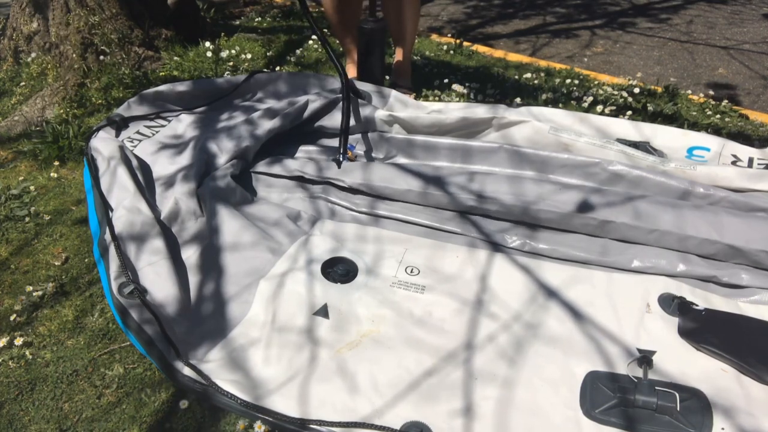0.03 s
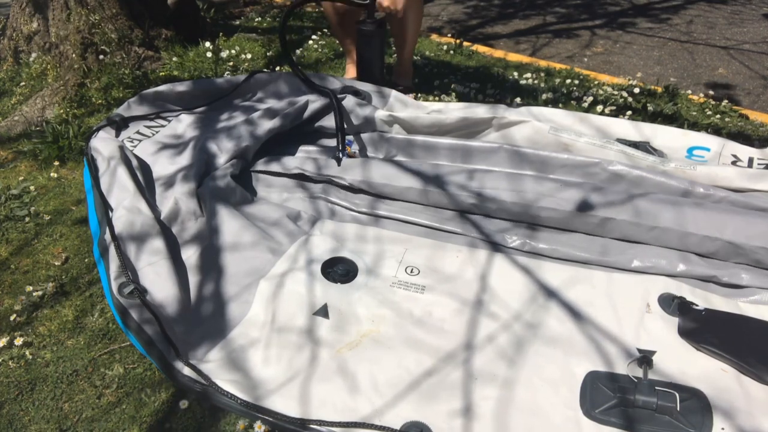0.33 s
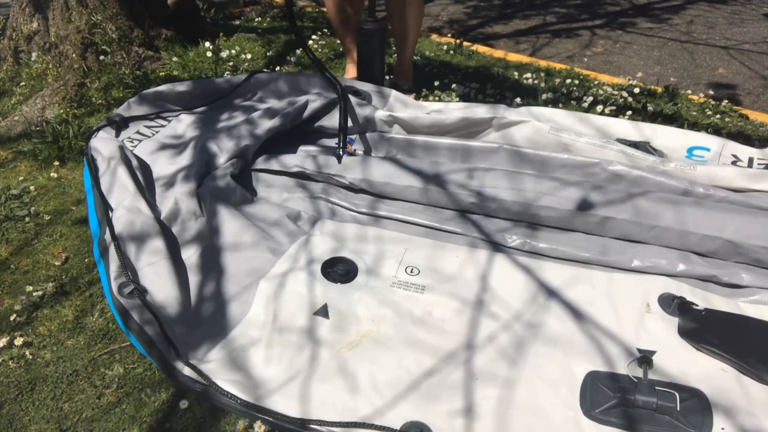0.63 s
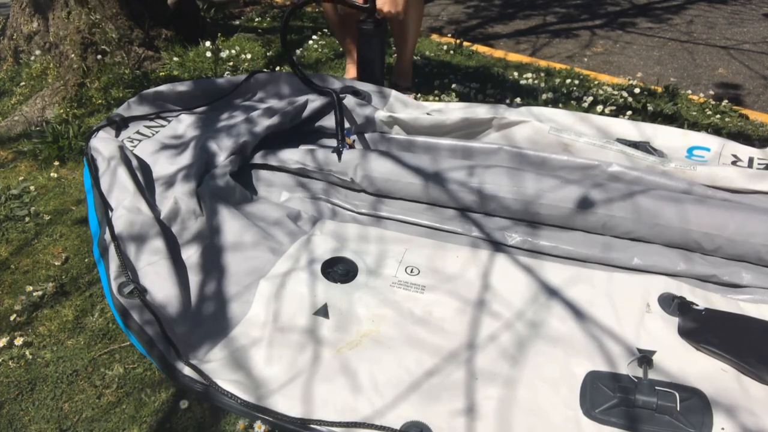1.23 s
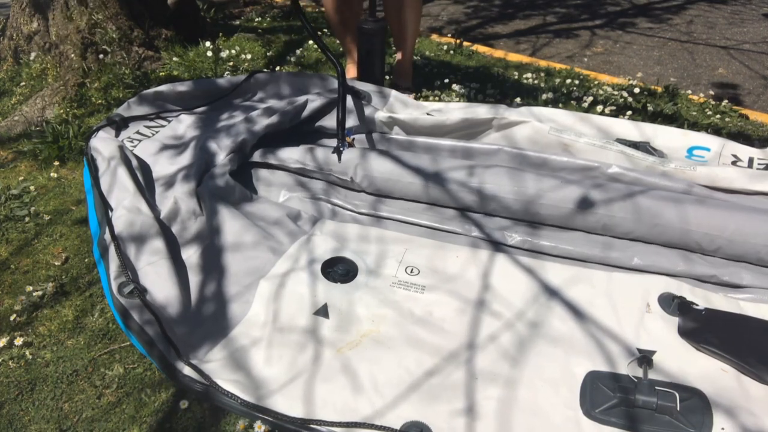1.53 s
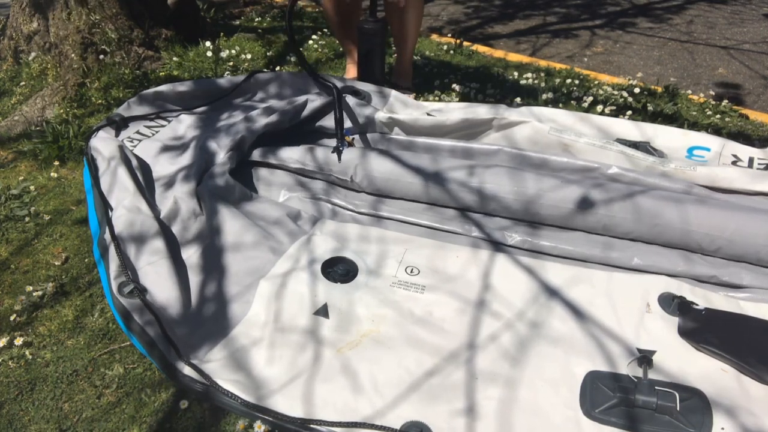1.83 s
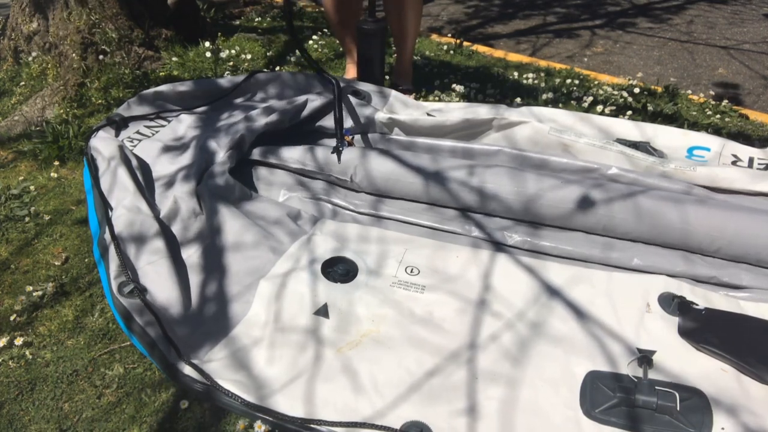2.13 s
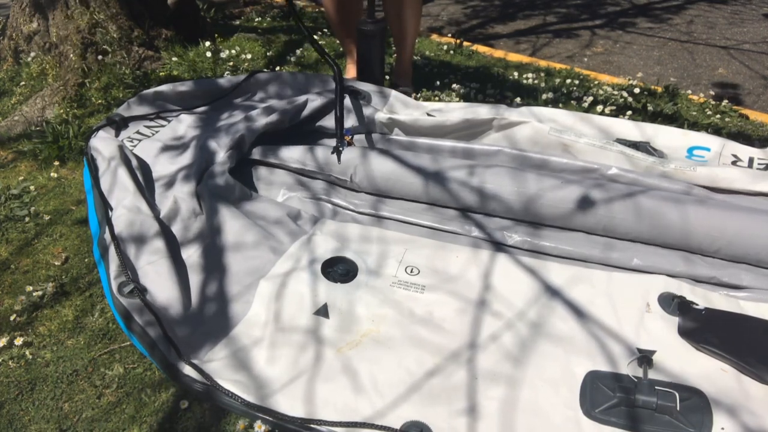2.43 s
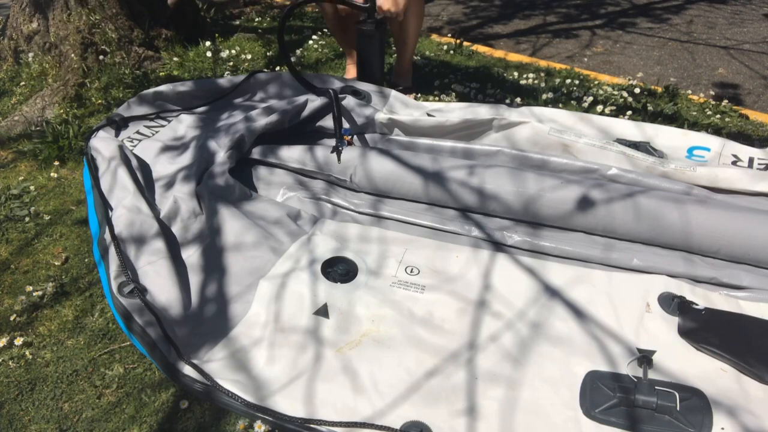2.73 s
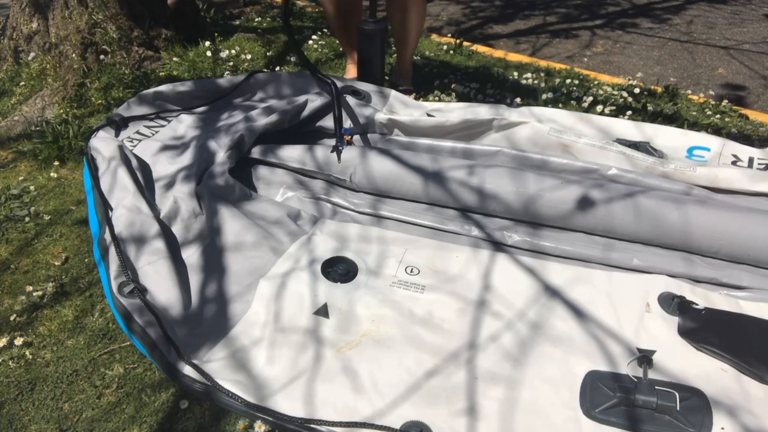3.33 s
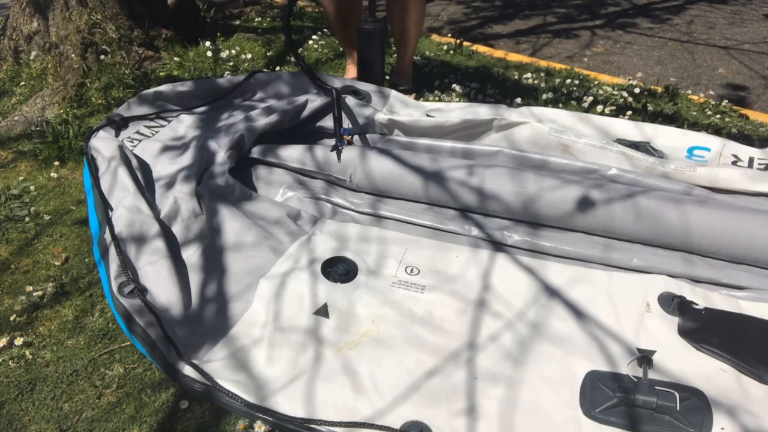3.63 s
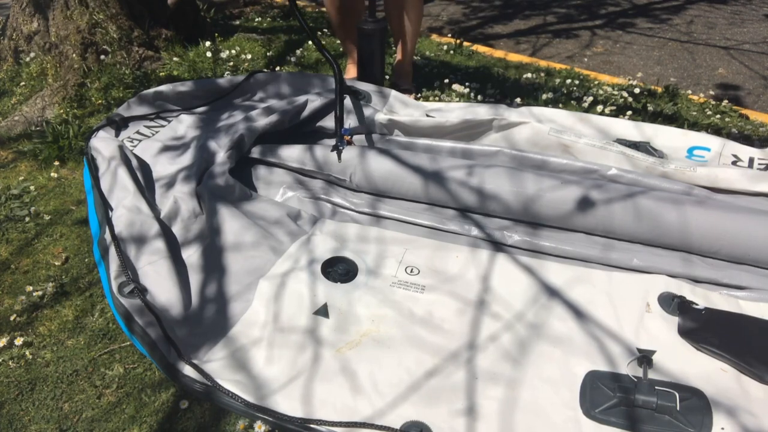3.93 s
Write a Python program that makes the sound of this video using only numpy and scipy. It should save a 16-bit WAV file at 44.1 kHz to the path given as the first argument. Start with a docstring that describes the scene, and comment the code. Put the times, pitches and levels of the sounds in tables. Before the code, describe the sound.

A hand pump inflates a boat outdoors with steady, alternating gusts of hissing air.

```python
"""Rhythmic gusts of air from a double-action hand pump, inflating a boat on a lawn at about two
and a half strokes a second. Air rushing through barrel and ports sounds hollow on the way down
and brighter on the way up, and opens into hiss as the piston gains speed. Valve flaps thump or
flutter briefly around the turns, and the plastic shaft ticks. Behind it lies a low outdoor hum."""
import sys
import numpy as np
from scipy import signal
from scipy.fft import rfft, irfft
from scipy.io import wavfile
from scipy.ndimage import uniform_filter1d

SR = 44100
rng = np.random.default_rng(int(sys.argv[2]) if len(sys.argv) > 2 else 0)


def store_wav(level_fs):
    """Save 16-bit WAV to argv[1]."""
    pcm = np.round(np.clip(np.atleast_2d(level_fs), -1, 1) * 32767)
    wavfile.write(sys.argv[1], SR, pcm.T.astype(np.int16))


N = 176400

# The pushes. Each row: start, length, speed-up and slow-down in seconds, then body, hiss and
# whistle trims in dB.
DOWNSTROKES = [(.03, 0.4, .12, 0.18, 0, 3.5, 1.5), (0.778, 0.41, 0.12, 0.15, -1.5, 2.5, 1),
               (1.58, 0.36, 0.1, 0.14, -1, 1, 0), (2.34, 0.39, .08, 0.15, -2, 0, -3),
               (3.123, 0.38, 0.071, 0.15, -2, -.5, -2), (3.961, .39, 0.072, .18, -3, -4, 0)]
# The pulls. Each row: start, length, speed-up and slow-down in seconds, body and hiss trims in dB,
# jet pitch at full flow in Hz, jet trim in dB.
UPSTROKES = [(0.371, 0.41, 0.17, .16, 2, -5, 4350, 2), (1.17, 0.45, 0.15, 0.22, 0.5, -4.5, 4360, 1),
             (1.918, 0.44, 0.16, .15, -2.5, -1.5, 5750, 1.5), (2.706, .44, 0.14, 0.15, -4, -1, 6830, 1),
             (3.485, .5, 0.16, 0.17, -5, 1, 7100, 2)]
# Faster air is brighter. Each row: frequency in Hz, dB of noise gained per dB of flow.
FLOW_STEEPNESS = [(300, .7), (700, 1.03), (1800, 1.77), (4000, 2.7), (6500, 2.98), (11000, 3), (16000, 2.2)]
# Broad colour of the air in each direction. Each row: frequency in Hz, relative level in dB.
DOWN_COLOUR = [(60, -11), (250, -7.5), (600, 6.5), (1100, 0), (1750, 1.5), (2350, -6.5), (2600, -9.5),
               (3150, -7), (3700, -1), (4600, -2), (5050, -10), (6200, 0), (7300, -1), (8000, -9),
               (9400, -6.5), (11500, -11.5), (12500, -19), (14100, -16), (14900, -13), (15800, -20)]
UP_COLOUR = [(60, -20), (270, -12), (550, 0.5), (850, 3), (1150, -7.5), (1650, 1), (2100, 2), (2500, -3),
             (3000, -4), (3900, 1), (5200, 1), (7500, 3), (9300, -1), (9800, -2), (12000, -4),
             (15800, -9.5)]
# Barrel and port resonances for push, pull and jet. Each row: centre and width in Hz, lift in dB.
DOWN_RESONANCES = [(605, 130, 3.5), (1506, 81, 12.5), (1931, 85, 16.5), (2353, 105, 8.5), (4350, 530, 5),
                   (6860, 500, 4.5), (8640, 270, 5)]
UP_RESONANCES = [(1666, 79, 4), (2105, 160, 4), (4450, 220, 0), (5140, 360, 3), (7030, 300, 4.5),
                 (8100, 400, -2), (9120, 470, 4)]
JET_RESONANCES = [(5250, 430, 0), (6550, 370, 1.5), (7540, 440, 3.5), (9070, 550, 3)]
# The spit as the upstroke's valve opens. Each row: centre and width in Hz, relative level in dB.
UP_SPIT_BANDS = [(1680, 550, 0.5), (4060, 380, 1)]
# Valve and piston thumps. Each row: start in seconds, level in dB, pitch in Hz, length in seconds.
THUMPS = [(.401, -20, 424, .004), (0.7788, -15.5, 483, 0.0075), (.789, -14, 450, 0.0033),
          (0.956, -20, 366, 0.0056), (1.184, -10, 469, 0.0083), (1.5868, -8, 505, 0.0045),
          (1.773, -23, 350, 0.0039), (1.9615, -13.5, 417, 0.0053), (2.345, -9, 519, 0.0062),
          (2.568, -21, 350, 0.0057), (2.742, -12.5, 410, 0.0061), (3.128, -7, 492, 0.006),
          (3.34, -13.5, 350, 0.0049), (3.538, -18, 420, .006), (3.971, -8, 432, 0.005)]
# The barrel's ring in a thump. Each row: ratio to the pitch, relative level in dB.
THUMP_MODES = [(.52, -10.5), (1, -0.5), (1.6, -6)]
# Flap flutters at the bottom of the stroke. Each row: start and length in seconds, level in dB,
# flap rate in Hz, decay in seconds.
FLUTTERS = [(1.931, 0.034, -7, 218, 0.017), (2.707, 0.064, -4.5, 221, 0.016),
            (3.489, 0.055, -6.5, 224, .024)]
# The flutter's harmonics from the fundamental up, each a relative level in dB.
FLUTTER_HARMONICS_DB = [-11.5, -19.5, -2.5, -21.5, -28]
# Shaft ticks. Each row: start in seconds, level in dB.
TICKS = [(0.038, -24), (0.047, -42), (0.384, -24), (2.688, -20.5), (2.716, -26), (2.731, -24), (2.751, -17),
         (3.49, -27.5), (3.507, -21.5)]
# Colours of the ticks and the outdoor rumble. Each row: frequency in Hz, relative level in dB.
PLASTIC_COLOUR = [(100, -17), (600, 9), (1800, 11), (2700, -4), (4200, 4), (7000, -14), (15000, -34)]
RUMBLE_COLOUR = [(20, -5), (38, -6.5), (60, -4), (105, 1.5), (180, -7), (400, -10.5), (900, -10.5),
                 (2000, -17.5), (4000, -28), (8000, -30.5), (15000, -40)]
# Steady background tones. Each row: pitch in Hz, level in dB.
HUM_TONES = [(58, -51), (87, -46.5), (116, -53.5), (144, -48.5), (3020, -54)]

DOWN_DB, UP_DB, RUMBLE_DB = -16, -14.5, -36
BODY_EDGE_HZ = 2520  # the barrel's body lies below, the hiss above
HOP = 128  # samples from one frame of a stroke to the next


def downstroke(length, rise, fall, body_db, hiss_db, whistle_db):
    """Air spits through the barely open valve, then rushes hollow, with a whistle and a barrel howl."""
    t, hz = stroke_grid()
    flow, fade = airflow(t, length, rise, fall)
    sag_db = -7.5 * (t / length - .5)  # the body thins over the stroke
    rush = air_colour(DOWN_COLOUR, hz, body_db + sag_db, hiss_db)
    whistle_hz = 10840 * flow ** .18 + 400 * wander(t.shape, span=(8, 1))
    whistle = amp(4.5 + whistle_db) * bell(hz, whistle_hz, 820) * bell(t, .056, .1)
    howl = amp(4) * bell(hz, 1580, 150) * bell(t, .19, .043)
    spit = amp(4) * bell(hz, 3990, 357) * bell(t, .041, .018)
    air = np.sqrt(rush ** 2 + whistle ** 2 + howl ** 2) * flow ** curve(FLOW_STEEPNESS, hz)
    shaft = tube_comb(hz, round_trip_s=.0021)  # sound bounces along the hollow shaft
    return amp(DOWN_DB) * turbulence(fade * shaft * np.hypot(air, spit), DOWN_RESONANCES)


def upstroke(length, rise, fall, body_db, hiss_db, jet_hz, jet_db):
    """The valve spits open, then air hisses brightly, with a jet whose pitch climbs with the flow."""
    t, hz = stroke_grid()
    flow, fade = airflow(t, length, rise, fall)
    sag_db = -6 * (t / length - .5)
    rush = air_colour(UP_COLOUR, hz, body_db + sag_db, hiss_db)
    jet_band = bell(np.log2(hz + 1), np.log2(jet_hz * flow ** .42), width=.32)  # in octaves
    jet = amp(jet_db + resonance_db(JET_RESONANCES, hz)) * jet_band
    spit_colour = sum(amp(db) * bell(hz, centre, width) for centre, width, db in UP_SPIT_BANDS)
    spit = spit_colour * bell(t, .1, .046)
    air = np.hypot(rush, jet) * flow ** curve(FLOW_STEEPNESS, hz)
    chamber = tube_comb(hz, round_trip_s=.000781 + .002726 * t)  # it lengthens, so its resonances sink
    return amp(UP_DB) * turbulence(fade * chamber * np.hypot(air, spit), UP_RESONANCES)


def airflow(t, length, rise, fall, idle_flow=.089, open_s=.012, turn_s=.044):
    """The piston speeds up, runs and slows; returns the flow and the fade at the stroke's ends."""
    speed_up = np.sin(np.pi / 2 * np.clip(t / rise, 0, 1))
    slow_down = np.sin(np.pi / 2 * np.clip((length - t) / fall, 0, 1))
    fade = np.clip(np.minimum(t / open_s, (length - t) / turn_s), 0, 1)
    return np.hypot(speed_up * slow_down, idle_flow), fade


def turbulence(gain, resonances, streak_db=2.5, eddy_db=1.38, flicker_db=.5):
    """Churning air: streaky, flickering noise, shaped by resonances and a gain per frame and bin."""
    size = (len(gain) - 1) * HOP
    fine, coarse = dict(nperseg=1024, noverlap=768), dict(nperseg=512, noverlap=512 - HOP)
    white = signal.stft(rng.standard_normal(size), **fine)[2].T
    streaked = white * amp(streak_db * wander(white.shape, span=(16, 2)))
    air = unit(signal.istft(streaked.T, **fine)[1][:size])
    lift = amp(resonance_db(resonances, np.fft.rfftfreq(size, 1 / SR)))
    resonant = irfft(rfft(air) * lift, size)
    frames = signal.stft(resonant, **coarse)[2].T
    eddies = eddy_db * wander(frames.shape, span=(9, 7))
    flicker = flicker_db * wander((len(frames), 1), span=(3, 1))
    return signal.istft((frames * gain * amp(eddies + flicker)).T, **coarse)[1]


def air_colour(colour, hz, body_db, hiss_db):
    """The broad tone of rushing air, with low body balanced against high hiss."""
    body_share = 1 / (1 + (hz / BODY_EDGE_HZ) ** 6)
    return amp(curve(colour, hz) + body_share * body_db + (1 - body_share) * hiss_db)


def tube_comb(hz, round_trip_s, depth_db=2):
    """The echo inside a tube combs the hiss with evenly spaced resonances."""
    return amp(depth_db * np.cos(2 * np.pi * hz * round_trip_s) * (hz > BODY_EDGE_HZ))


def resonance_db(resonances, hz):
    """The peaks and dips that barrel and ports put on the air."""
    return sum(db / (1 + (2 * (hz - centre) / width) ** 2) for centre, width, db in resonances)


def thump(db, hz, length, attack_s=.0019, pitch_sag=.083):
    """A flap seats: a few sinking cycles ring in the barrel, with a small dull puff."""
    t = np.arange(2000) / SR
    cycles = hz * np.cumsum(np.exp(-pitch_sag * (2 * t / length - 1))) / SR
    ring = sum(amp(level) * np.sin(2 * np.pi * ratio * cycles) for ratio, level in THUMP_MODES)
    puff = unit(signal.lfilter(*signal.butter(2, 1700, fs=SR), rng.standard_normal(len(t))))
    envelope = np.minimum(t / attack_s, 1) / (1 + (t / length) ** 6)
    return amp(db) * envelope * (ring + amp(-16.5) * puff)


def flutter(length, db, hz, decay, fade_s=.0051):
    """A flap flutters in a short dying honk; the barrel favours its third harmonic."""
    t = np.arange(0, length, 1 / SR)
    honk = sum(amp(level) * np.sin(2 * np.pi * k * hz * t)
               for k, level in enumerate(FLUTTER_HARMONICS_DB, 1))
    fade = np.clip(np.minimum(t, length - t) / fade_s, 0, 1)
    return amp(db) * fade * np.exp(-t / decay) * honk


def shaft_tick(db, decay_s=.0043):
    """The plastic shaft gives a light, dry click."""
    burst = noise(PLASTIC_COLOUR, size=1500)
    t = np.arange(len(burst)) / SR
    return amp(db) * burst * np.exp(-t / decay_s)


def outdoors(waver_hz=4.28):
    """A bed of soft rumble with a low wavering hum and one faint high tone."""
    bed = amp(RUMBLE_DB) * noise(RUMBLE_COLOUR, size=N)
    for hz, db in HUM_TONES:
        pitch = hz + waver_hz * wander((N, 1), span=(2500, 1))[:, 0]
        bed += amp(db) * np.sqrt(2) * np.sin(2 * np.pi * np.cumsum(pitch) / SR)
    return bed


def noise(colour, size):
    """Coloured noise with an rms of one."""
    gain = amp(curve(colour, np.fft.rfftfreq(size, 1 / SR)))
    return unit(irfft(rfft(rng.standard_normal(size)) * gain, size))


def wander(shape, span):
    """Random drift with an rms of one, smoothed over a span of (time steps, bins)."""
    drift = rng.standard_normal(shape)
    for axis, steps in enumerate(span):
        drift = uniform_filter1d(uniform_filter1d(drift, steps, axis), steps, axis)
    return unit(drift)


def stroke_grid():
    """Frame times in seconds and bin frequencies in Hz for one stroke."""
    return np.arange(210)[:, None] * HOP / SR, np.fft.rfftfreq(512, 1 / SR)


def curve(points, hz):
    """Joins a table's points along log frequency."""
    point_hz, value = np.transpose(points)
    return np.interp(np.log(hz + 1), np.log(point_hz + 1), value)


def bell(x, centre, width):
    """A smooth hump of height one: a band in frequency or a swell in time."""
    return np.exp(-.5 * ((x - centre) / width) ** 2)


def amp(db):
    """Decibels to gain."""
    return 10 ** (np.asarray(db) / 20)


def unit(x):
    """Scales to an rms of one."""
    return x / np.sqrt(np.mean(x ** 2) + 1e-20)


def scene():
    """The pump over the outdoor bed, alike in both channels."""
    mix = outdoors()
    layers = [(downstroke, DOWNSTROKES), (upstroke, UPSTROKES),
              (thump, THUMPS), (flutter, FLUTTERS), (shaft_tick, TICKS)]
    for source, cues in layers:
        for start, *settings in cues:
            sound = source(*settings)
            slot = mix[round(start * SR):][:len(sound)]
            slot += sound[:len(slot)]
    return np.array([mix, mix])


def record(dry, cutoff_hz=15780):
    """A steep low-pass takes the very top off the hiss."""
    lowpass = signal.firwin(511, cutoff_hz, window=("kaiser", 9), fs=SR)
    return signal.oaconvolve(dry, lowpass[None], "same")


dry = scene()
out = record(dry)
store_wav(out)
```